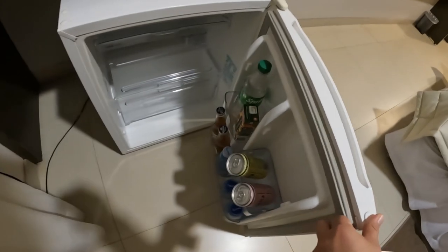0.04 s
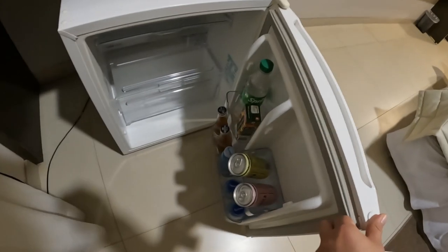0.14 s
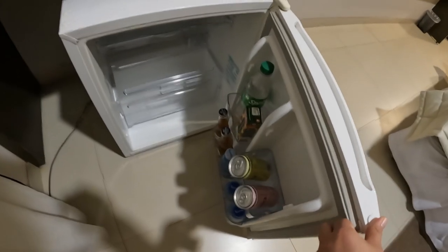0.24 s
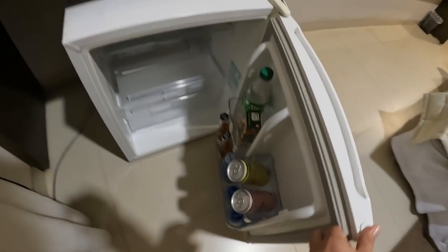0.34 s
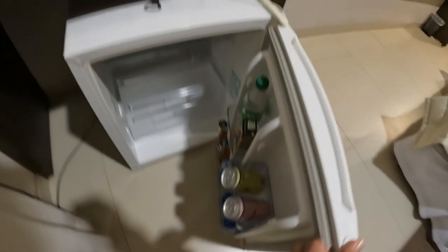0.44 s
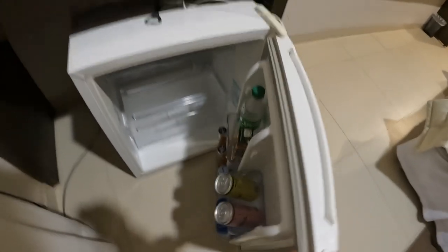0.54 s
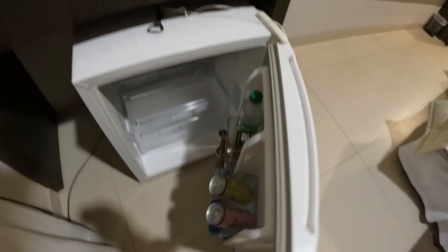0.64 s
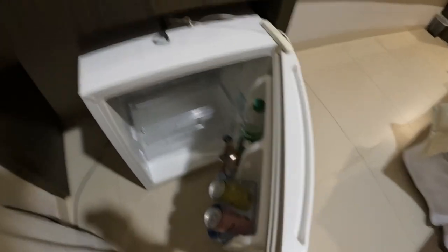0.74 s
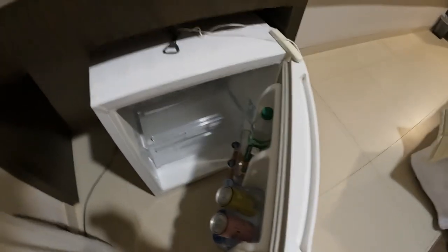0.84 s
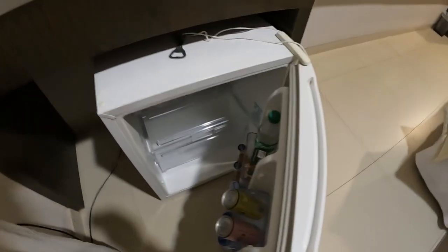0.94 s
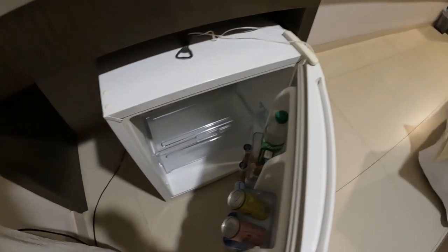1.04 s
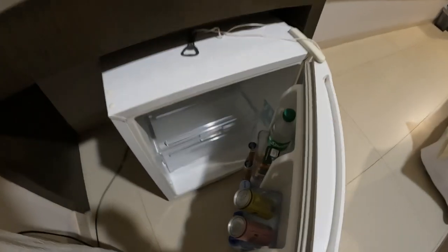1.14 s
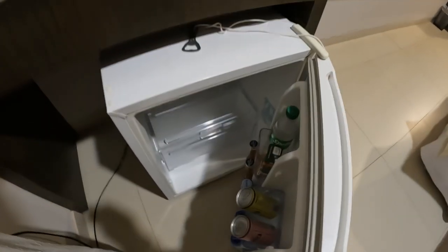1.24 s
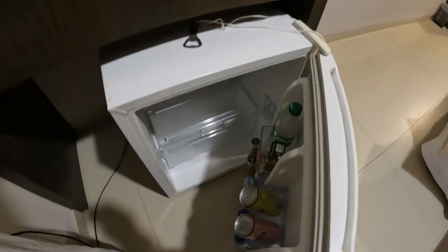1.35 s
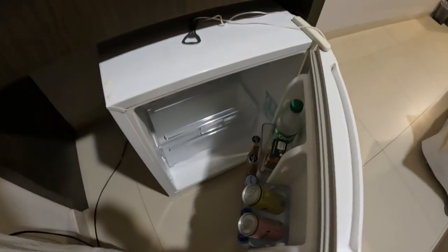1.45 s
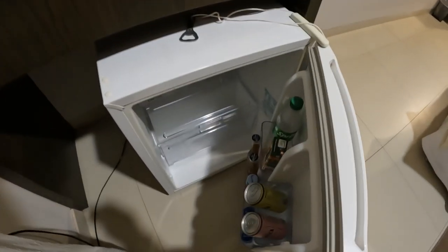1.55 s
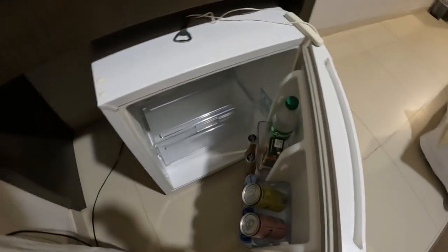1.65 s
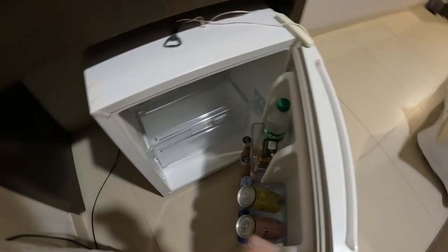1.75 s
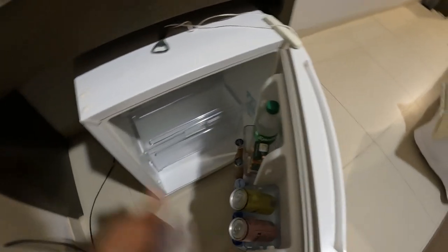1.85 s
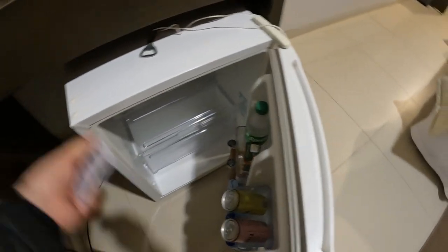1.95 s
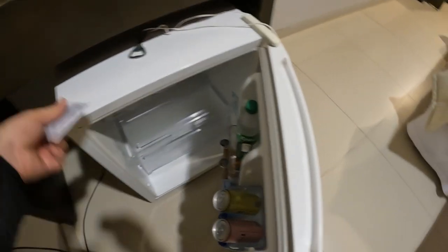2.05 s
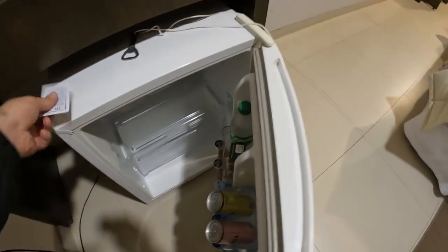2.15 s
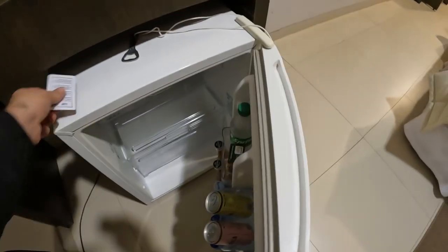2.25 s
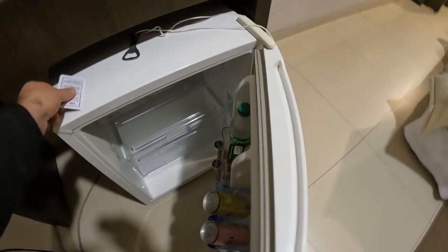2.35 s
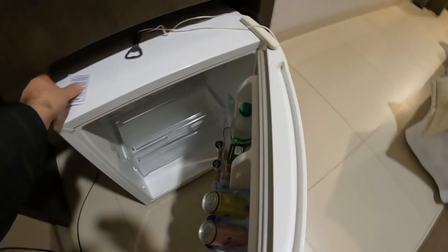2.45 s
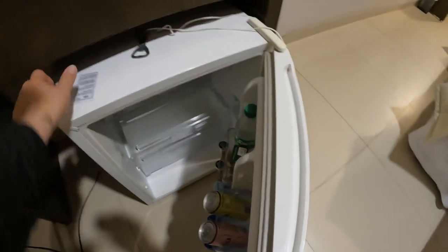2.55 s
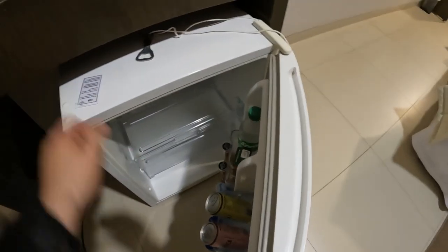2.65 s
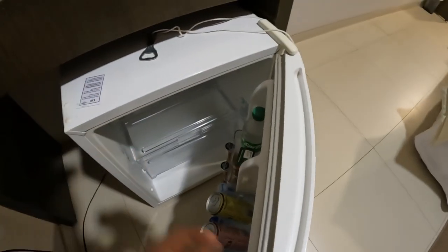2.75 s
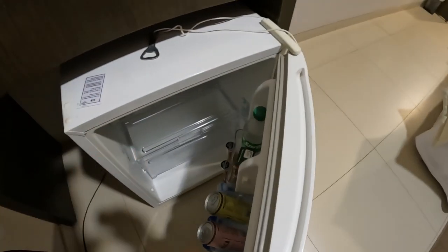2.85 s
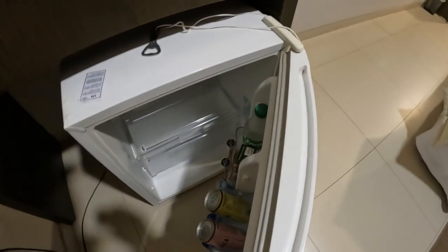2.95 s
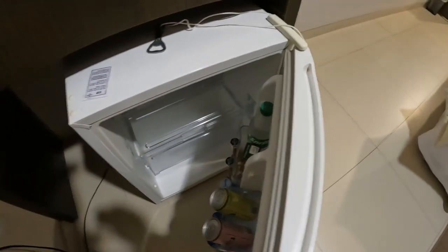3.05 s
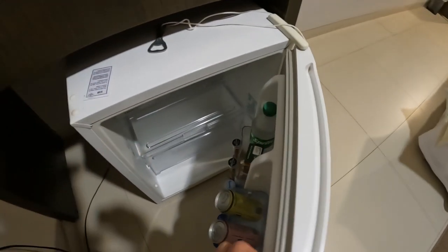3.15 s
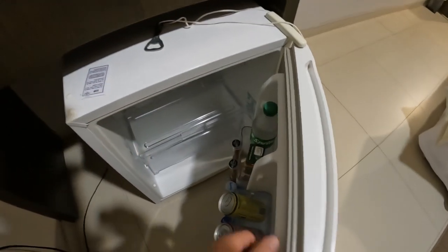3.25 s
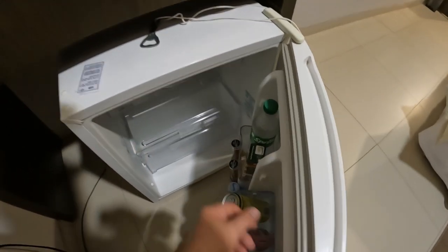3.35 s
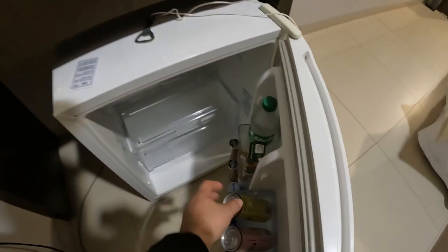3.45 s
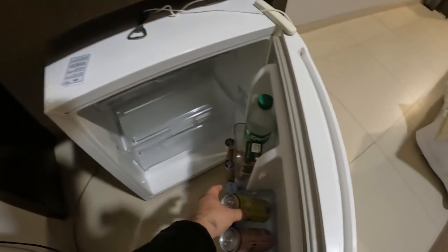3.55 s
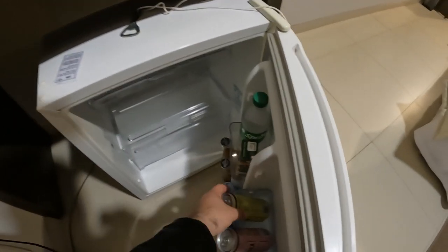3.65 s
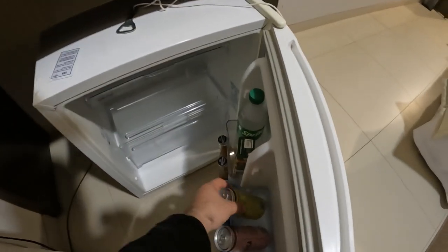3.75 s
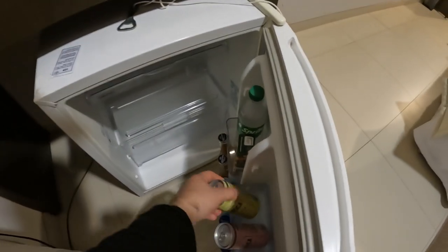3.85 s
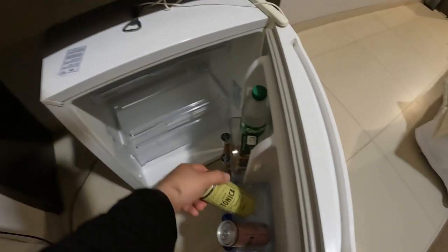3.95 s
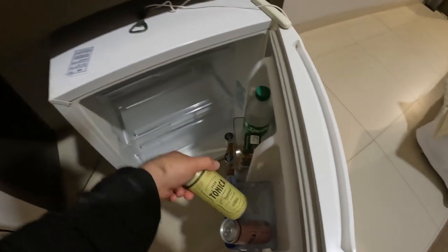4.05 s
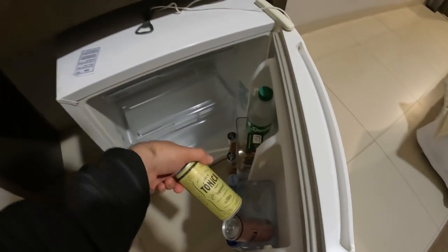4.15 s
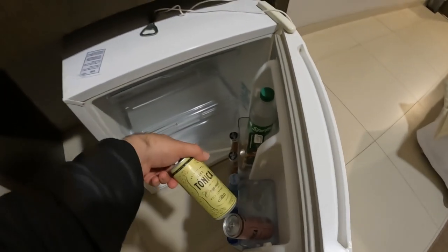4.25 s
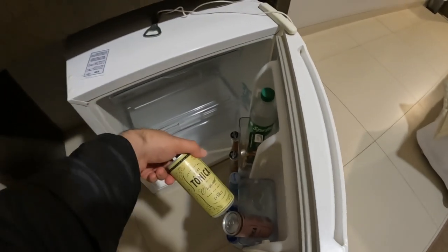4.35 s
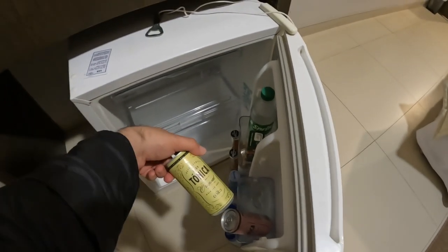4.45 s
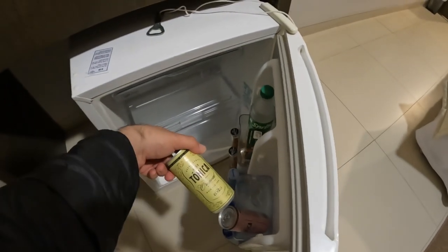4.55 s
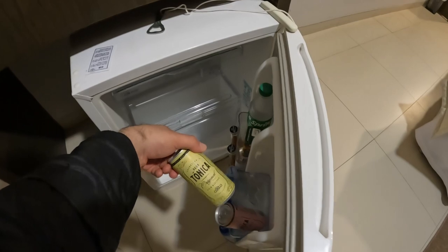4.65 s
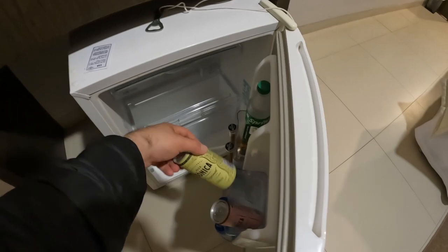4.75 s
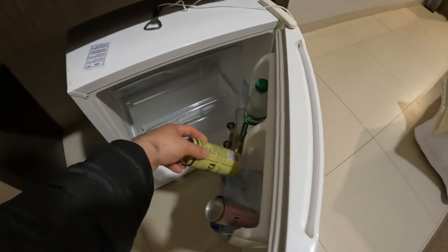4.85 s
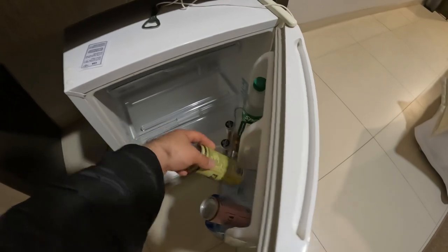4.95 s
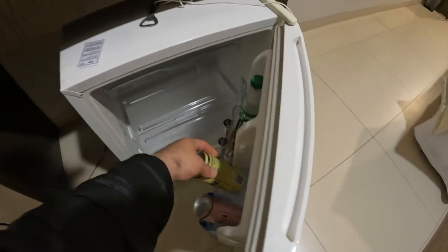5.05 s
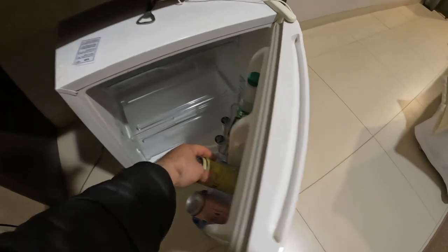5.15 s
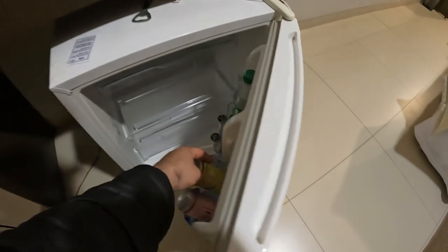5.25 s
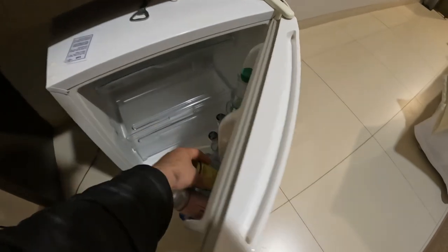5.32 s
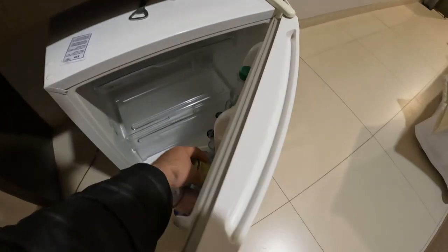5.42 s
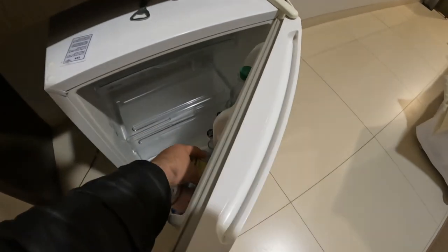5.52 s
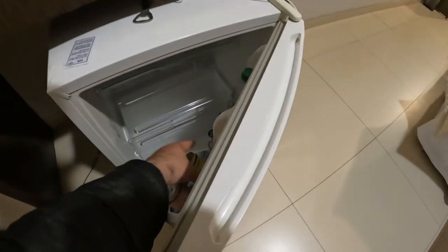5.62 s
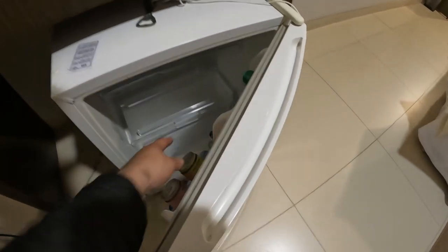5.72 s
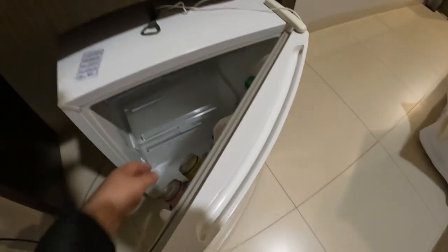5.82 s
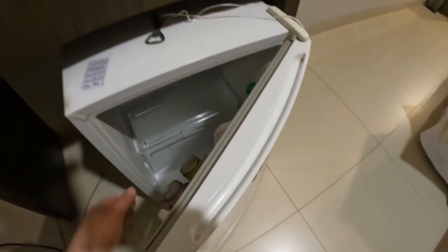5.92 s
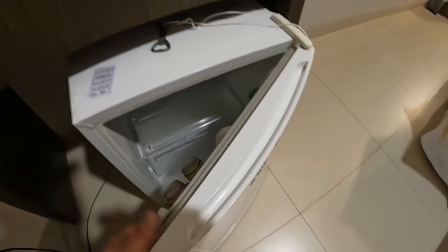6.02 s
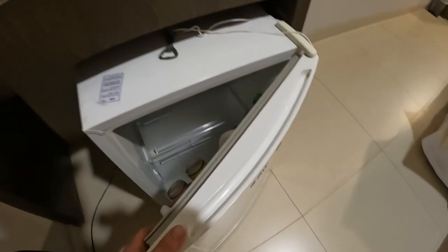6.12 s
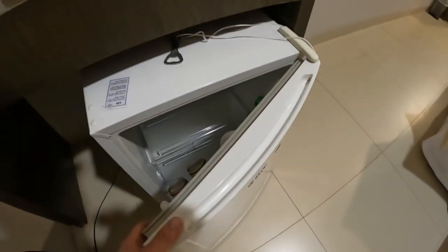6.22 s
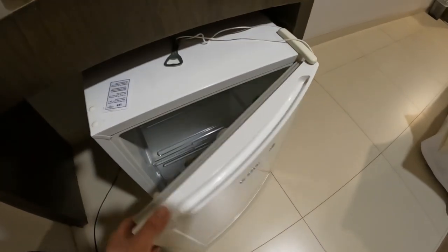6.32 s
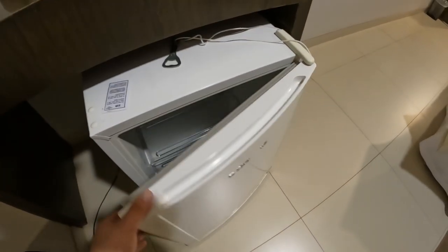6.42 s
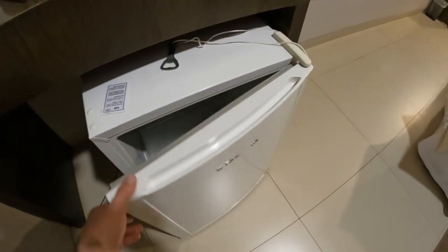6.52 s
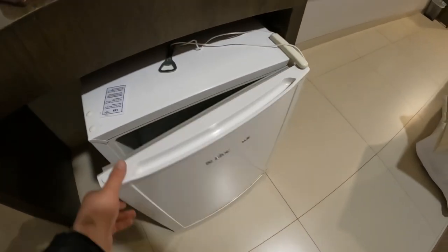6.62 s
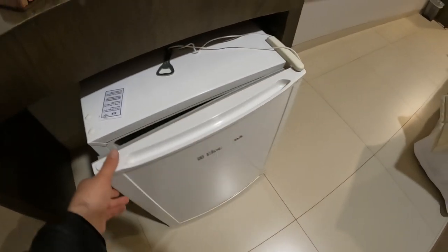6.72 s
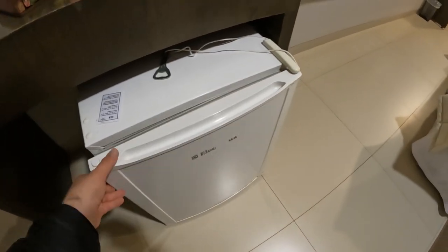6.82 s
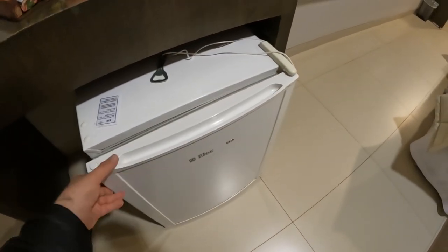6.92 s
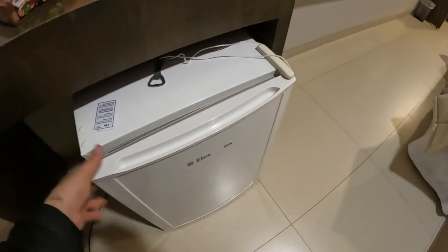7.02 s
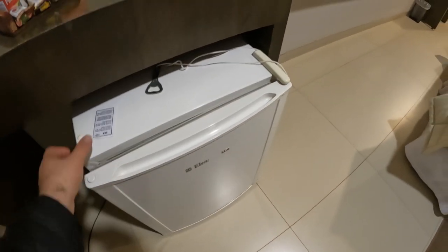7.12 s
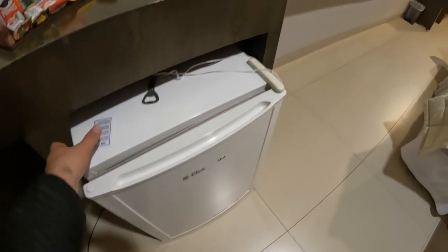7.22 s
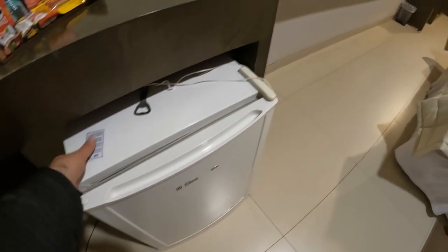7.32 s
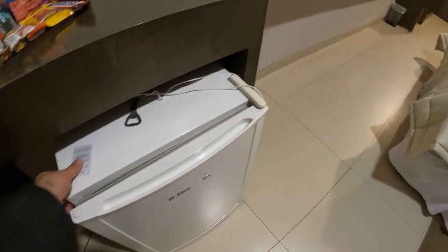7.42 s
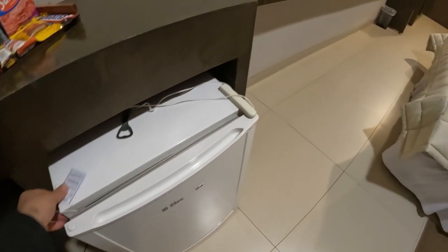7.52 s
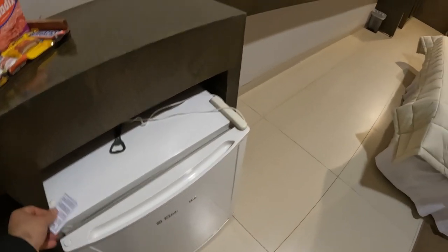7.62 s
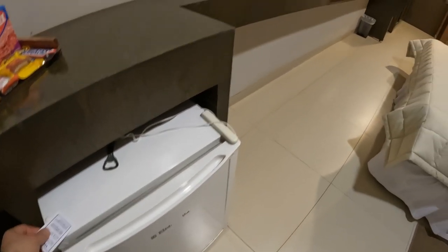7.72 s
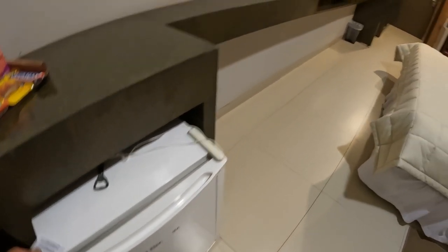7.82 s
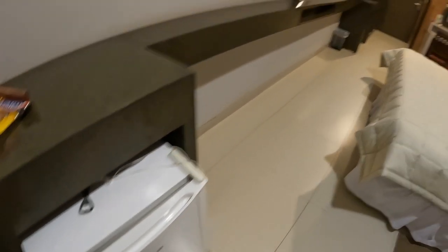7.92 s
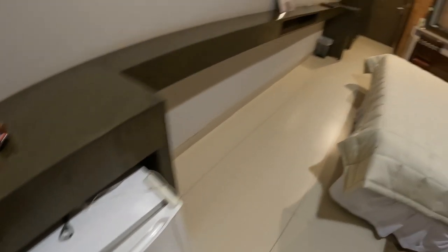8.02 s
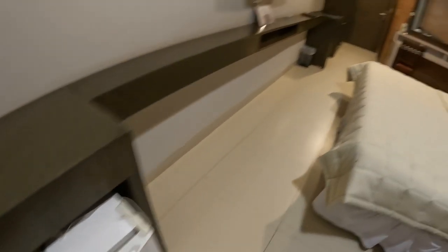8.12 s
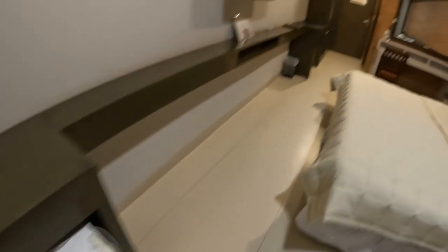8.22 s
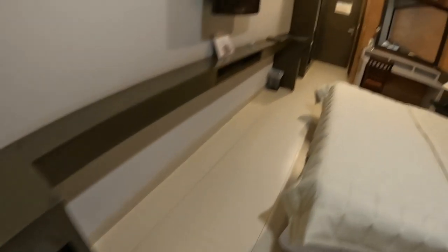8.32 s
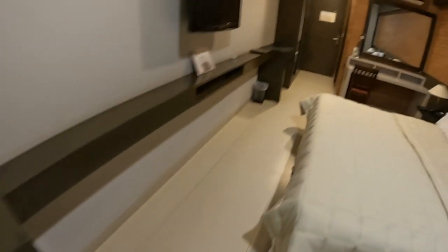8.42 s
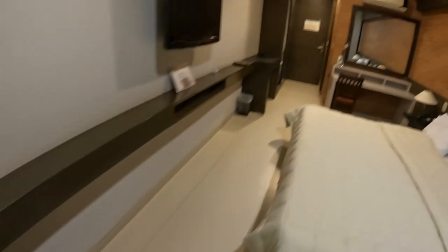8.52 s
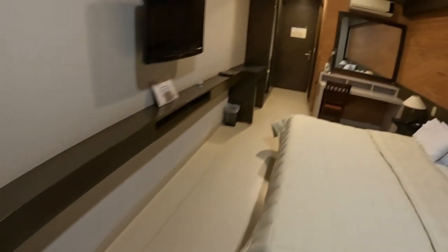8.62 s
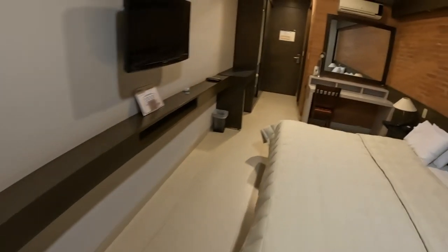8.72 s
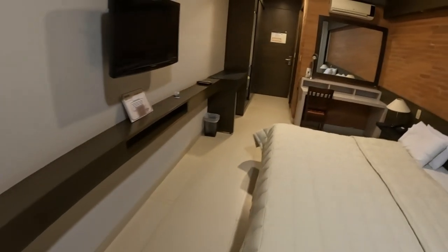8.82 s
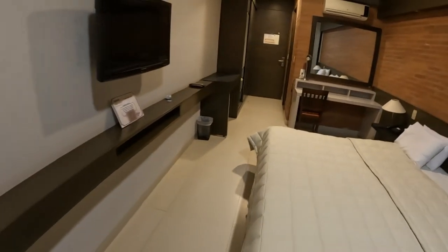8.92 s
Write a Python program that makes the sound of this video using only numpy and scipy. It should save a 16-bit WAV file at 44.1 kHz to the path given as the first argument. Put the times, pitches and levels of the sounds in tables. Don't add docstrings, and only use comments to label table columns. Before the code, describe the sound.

Close handling of a mini fridge: hollow plastic knocks, bright can clatter, a boomy door slam, then a squeaky plastic card drag.

```python
import sys
import numpy as np
from scipy import signal
from scipy.fft import rfft, irfft, next_fast_len
from scipy.io import wavfile
from scipy.ndimage import uniform_filter1d

SR = 44100
rng = np.random.default_rng(int(sys.argv[2]) if len(sys.argv) > 2 else 0)


def volts(x):
    e = np.asarray(x, float) / 20
    return 10 ** e


def pcm_store(signal):
    levels = np.round(np.clip(np.atleast_2d(signal), -1, 1) * 32767)
    wavfile.write(sys.argv[1], SR, levels.astype(np.int16).T)


N = 395577


def evened(x):
    return x / np.sqrt(np.mean(x ** 2) + 1e-20)


def peaked(x):
    return x / (abs(x).max() + 1e-20)


def read(points, hz):
    f, value = np.transpose(points)
    return np.interp(np.log(hz + 1), np.log(f + 1), value)


def curve(rows):
    rows = np.array(rows)
    return np.interp(np.arange(N) / SR, rows[:, 0], rows[:, 1])


def add(mix, start_s, sound):
    part = mix[..., round(start_s * SR):][..., :sound.shape[-1]]
    part += sound[..., :part.shape[-1]]


def band(x, lo_hz, hi_hz):
    sos = signal.butter(2, [lo_hz, min(hi_hz, 0.45 * SR)], "band", fs=SR, output="sos")
    return signal.sosfilt(sos, x)


def left_right(difference_db):
    return volts(np.array([[difference_db / 2], [-difference_db / 2]]))


def wander(count, size):
    return uniform_filter1d(rng.standard_normal(count), size=size)


def hiss(tone, same, side, patchy_db, flicker_db, size, tilt_db=np.zeros(N)):
    hop = size // 4
    frames, hz = 4 * N // size + 5, np.fft.rfftfreq(size, 1 / SR)
    a, b, c, d, patches = rng.standard_normal((frames, len(hz), 5)).T
    patches = uniform_filter1d(patches, size=6, axis=0)
    patches = evened(uniform_filter1d(patches, size=8, axis=1))
    flicker = evened(wander(frames, 3))
    frame_tilt = tilt_db[np.minimum(np.arange(frames) * hop, N - 1)]
    tilt = np.outer(np.log2((hz + 200) / 4000), frame_tilt)
    same = np.clip(read(same, hz), -1, 1)[:, None]
    left = a + 1j * b
    right = same * left + np.sqrt(1 - same ** 2) * (c + 1j * d)
    z = np.array([left, right])
    z *= volts(read(tone, hz)[:, None] + patchy_db * patches + flicker_db * flicker + tilt)
    z *= volts(np.multiply.outer([0.5, -0.5], read(side, hz)))[:, :, None]
    out = signal.istft(z, nperseg=size, noverlap=3 * hop)[1][:, :N]
    return out / np.sqrt(np.mean(out.mean(0) ** 2))


def ring(level_db, hz, t60_s, rise_s):
    t = np.arange(round(min(t60_s, 1.2) * SR)) / SR
    return volts(level_db - 60 * t / t60_s) * (1 - np.exp(-t / rise_s)) * np.sin(2 * np.pi * hz * t)


def knock(row, modes, rattle, linger, tone_hz, contact_s, treble_t60_s):
    start_s, body_db, shelf_db, tick_db = row
    t, noise = np.arange(SR // 3) / SR, rng.standard_normal((4, SR // 3))
    hz, db, t60 = np.transpose(2 * (list(modes) + [(tone_hz, 0, 0.08)]))[:, :, None]
    db = db + 4 * rng.standard_normal(hz.shape)
    hz = hz * (1 + 0.023 * rng.standard_normal(hz.shape))
    t60 = linger * np.minimum(t60, 0.32 * np.sqrt(500 / hz))
    tones = volts(db - 60 * t / t60) * np.sin(2 * np.pi * hz * t)
    blow = noise[0, :400] * np.exp(-t[:400] / 0.00045)
    is_low = hz[:, 0] < 800
    low = signal.oaconvolve(tones[is_low].sum(0), blow)[:len(t)]
    high = signal.oaconvolve(tones[~is_low].sum(0), blow)[:len(t)]
    loose = volts(1.7 * evened(uniform_filter1d(noise[0], size=150)))

    shelf_noise = band(noise[1] * volts(-60 * t / (0.34 * linger)), 154, 520)
    shelf = peaked(low) + rattle * peaked(shelf_noise)
    clatter = noise[2] * loose * (volts(-60 * t / 0.077) + 0.5 * volts(-60 * t / (0.24 * linger)))
    body = peaked(high) + rattle * peaked(band(band(clatter, 660, 1770), 690, 2670))
    crack = volts(-60 * t / 0.0027) + 0.83 * loose * volts(-60 * t / treble_t60_s)
    tick = band(band(noise[3] * crack, 1630, 5290), 1600, 16000)

    soft = 1 - np.exp(-t / contact_s)
    shelf *= 1 - np.exp(-t / 0.003)
    out = volts(shelf_db) * peaked(shelf) + volts(body_db) * peaked(body * soft)
    return start_s, out + volts(tick_db + 6.5) * peaked(tick * soft)


def struck(rows, modes, **feel):
    out = np.zeros(N)
    for row in rows:
        add(out, *knock(row, modes, **feel))
    return out


# start_s, body_db, shelf_db, tick_db
DOOR_BLOWS = [(0.314, -42, -44.5, -87), (0.347, -43, -38, -80), (0.798, -53, -35, -70),
              (0.827, -52, -37, -79), (0.8815, -33.5, -35, -55), (1.667, -34, -26.5, -44),
              (1.759, -37.5, -29.5, -58), (4.03, -57, -50.5, -58), (2.909, -45.5, -42.5, -52),
              (3.012, -68, -42.5, -81), (3.053, -55, -38.5, -74), (3.157, -51, -43.5, -56.5),
              (3.345, -50, -42, -71), (3.45, -28, -26.5, -46.5), (6.011, -48, -47.5, -53),
              (6.143, -47.5, -40, -54), (6.309, -53, -39.5, -76), (6.34, -38.5, -29.5, -62),
              (6.429, -55, -52, -80), (6.496, -51, -47, -85), (6.759, -53.5, -47.5, -69),
              (8.341, -52, -43, -64)]
# pitch_hz, level_db, t60_s
DOOR_MODES = [(182.7, 1.5, 1), (297.4, 1.5, 0.75), (360, 1, 0.14), (542, -15, 0.083), (645, -6.5, 0.41),
              (1025, -2, 0.56), (1122, 0, 0.16), (1450, 0, 0.45), (1780, -27.5, 0.21), (2020, -42.5, .12)]


def door():
    return struck(DOOR_BLOWS, DOOR_MODES, rattle=0.99, linger=0.64, tone_hz=1100,
                  contact_s=0.00056, treble_t60_s=0.07)


# start_s, body_db, shelf_db, tick_db
CAN_BLOWS = [(3.756, -35.5, -36, -58), (3.784, -24.5, -22.5, -41), (3.806, -21.5, -21.5, -35),
             (3.828, -36, -37, -45), (5.376, -40, -48, -58), (5.387, -13, -23.5, -22.5),
             (5.403, -16, -18, -31), (5.45, -20, -16, -45), (5.474, -15, -18.5, -28.5),
             (5.499, -22.5, -17.5, -53), (5.638, -31, -25, -44), (5.666, -25.5, -24, -53),
             (5.699, -23, -22, -45.5), (5.733, -35, -30, -62), (5.916, -44, -53, -69.5)]
# pitch_hz, level_db, t60_s
CAN_MODES = [(162.7, -9, 0.5), (250, -14, 0.68), (353.8, -4, 0.83), (773, -3.5, 0.14), (965, -13.5, 0.083),
             (1060, -19, 0.37), (1417, -22, 0.15), (1740, -20.5, 0.27), (2500, -29.5, 0.21),
             (2880, -20, 0.073)]


def cans():
    return struck(CAN_BLOWS, CAN_MODES, rattle=1.2, linger=0.55, tone_hz=1049,
                  contact_s=0.00036, treble_t60_s=0.068)


# start_s, body_db, shelf_db, tick_db
CARD_BLOWS = [(1.0095, -31, -42, -37.5), (2.408, -32, -39, -34.5), (2.428, -33.5, -44, -34),
              (2.446, -28.5, -31.5, -32), (2.568, -44, -35, -60), (7.68, -50, -45, -45)]
# pitch_hz, level_db, t60_s
CARD_MODES = [(247.5, -2, 0.25), (475.5, -9, 0.24), (685, -33, 0.12), (894, -32, 0.059), (1060, -3, 0.26),
              (1210, -32, 0.066), (2390, 6.5, 0.044), (2900, -31, .04)]


def card_slaps():
    return struck(CARD_BLOWS, CARD_MODES, rattle=1.05, linger=0.89, tone_hz=1258,
                  contact_s=0.00024, treble_t60_s=0.057)


# start_s, body_db, shelf_db, tick_db
SLAM_BLOWS = [(6.895, -16, -13.5, -26.5), (6.936, -20, -22, -47), (6.952, -24.5, -21.5, -45),
              (7.031, -31.5, -21, -55), (7.129, -55, -42, -64.5), (7.302, -36.5, -34.5, -60),
              (7.39, -45, -35.5, -58), (7.556, -47, -41.5, -63), (6.877, -43, -32.5, -59)]
# pitch_hz, level_db, t60_s
CABINET_MODES = [(184.6, -3.5, 0.53), (391.5, -3, 0.48), (497, -13, 0.15), (540, -30, 0.31),
                 (715, -12, 0.43), (920, -16, 0.57), (986, -4, 0.54), (1155, -10, 1), (1430, 3, 0.31),
                 (1600, -11, 0.26), (2100, -3, 0.21), (2340, -14, 0.23)]


def slam():
    return struck(SLAM_BLOWS, CABINET_MODES, rattle=1.55, linger=0.85, tone_hz=1400,
                  contact_s=0.0027, treble_t60_s=0.065)


def boom(level_db, hz, t60_s):
    spread = 1 + np.array([0, -0.099, 0.3, 1.2]) * rng.uniform(0.8, 1.2, 4)
    weights = [0.86, 0.3, 0.38, 0.21]
    return volts(level_db) * peaked(sum(w * ring(0, hz * k, t60_s, 0.0071) for k, w in zip(spread, weights)))


# start_s, level_db, t60_s
SIDE_PANEL = [(1.763, -29, 0.43), (1.85, -35.5, 0.26), (3.452, -28, 0.68), (5.471, -13.5, 0.58),
              (5.644, -23.5, 0.83), (5.697, -17.5, 0.54), (6.011, -39, 0.19), (6.399, -29.5, 0.37),
              (6.777, -35, 1)]
# start_s, level_db, t60_s
TOP_PANEL = [(1.669, -30.5, 0.73), (5.386, -26, 1), (6.319, -29.5, 0.78)]
# start_s, level_db, t60_s
BACK_PANEL = [(0.349, -35.5, 0.86), (0.901, -31.5, 0.089), (2.918, -33.5, 0.66), (6.15, -31.5, 0.66),
              (6.88, -20, 1), (6.896, -11, 0.29), (6.96, -11, 0.48), (7.089, -22.5, 0.1),
              (7.187, -23.5, 0.52), (7.309, -50, 0.86), (8.341, -50.5, 0.18)]
# start_s, level_db, pitch_hz, t60_s
FLOOR = [
    (1.68, -37.5, 43, 1.1),
    (2.92, -33, 33, 0.6),
    (6.892, -17, 32.1, 1.7),
]


def cabinet():
    out = np.zeros(N)
    for hz, rows in ((82.1, SIDE_PANEL), (108.9, TOP_PANEL), (64.17, BACK_PANEL)):
        for start_s, level_db, t60_s in rows:
            add(out, start_s, boom(level_db, hz, t60_s))
    for start_s, level_db, hz, t60_s in FLOOR:
        add(out, start_s, boom(level_db, hz, t60_s))
    return out


# start_s, level_db, pitch_hz, t60_s
BOTTLE_TONES = [(5.779, -50, 538, 1.8), (.316, -47.5, 545, 0.41), (.883, -38, 545, 0.21),
                (1.02, -44, 1085, 0.12), (1.762, -31, 675, 0.032), (3.758, -36, 306, 0.07),
                (3.811, -20.5, 364.6, 0.34), (5.39, -26, 366.7, 0.53), (5.477, -19.5, 374.7, 0.5),
                (5.678, -29, 301, 0.26), (6.95, -15, 243.5, 0.073), (7.305, -48, 1070, 0.38),
                (3.83, -60, 3800, 0.23), (3.86, -55, 3810, 0.07), (5.52, -51, 3860, .3),
                (6.42, -60, 1830, 0.042)]


def bottles():
    out = np.zeros(N)
    for start_s, level_db, hz, t60_s in BOTTLE_TONES:
        add(out, start_s, ring(level_db, hz, t60_s, 0.004) + 0.3 * ring(level_db, 1.03 * hz, t60_s, 0.004))
        add(out, start_s, ring(level_db + 3, hz, 0.08, 0.004))
    return out


# start_s, level_db, pitch_hz, t60_s
PINGS = [(.827, -40.5, 1035, .04), (0.847, -46, 950, .05), (0.315, -45, 1430, .06),
         (0.8813, -37, 1857, 0.053), (6.498, -51, 1820, 0.08), (1.011, -35, 2390, 0.041),
         (1.014, -34.5, 1222, 0.051), (2.408, -39, 1196, 0.071), (2.412, -38, 2690, 0.089),
         (2.426, -36, 4600, .05), (2.447, -30.5, 2474, 0.08), (2.446, -35.5, 1203, 0.17),
         (3.756, -35.5, 1040, .04), (3.7835, -14.5, 1065, 0.026), (3.7834, -26, 1600, 0.034),
         (3.7837, -31, 2840, 0.046), (3.7835, -32, 3330, 0.027), (3.7835, -43, 7100, 0.024),
         (3.806, -27.5, 3740, 0.028), (3.807, -38, 2400, 0.046), (3.811, -39, 3030, 0.044),
         (3.828, -36.5, 1490, 0.065), (3.846, -45, 1600, 0.05), (5.3873, -20, 1130, 0.058),
         (5.3875, -19, 1745, .08), (5.388, -21.5, 2358, 0.075), (5.388, -25, 2750, 0.066),
         (5.389, -34, 4237, .07), (5.388, -35, 5540, .05), (5.404, -20, 1984, 0.055),
         (5.404, -26, 1090, 0.045), (5.474, -17, 1422, 0.074), (5.475, -21.5, 916, 0.12),
         (5.471, -23.5, 2745, 0.045), (5.472, -24, 3890, 0.049), (5.472, -30.5, 5990, 0.032),
         (5.699, -29.5, 1755, 0.036), (5.7, -36.5, 4130, 0.029), (6.311, -43.5, 1820, 0.059),
         (6.31, -43, 1365, 0.064), (6.34, -28, 1090, 0.033), (6.342, -37, 1795, 0.05),
         (6.936, -23, 2000, .05), (6.935, -24, 970, 0.055), (7.031, -22, 984, 0.074),
         (7.03, -28, 1450, 0.047), (7.033, -37.5, 3430, 0.041),
         (.348, -45.5, 560, .2), (.815, -38, 350, 0.12), (.727, -46, 400, 0.11), (1.684, -41, 1450, .07),
         (1.759, -32.5, 1124, 0.056), (3.012, -40.5, 331, 0.15), (3.055, -49, 960, 0.078),
         (3.158, -42, 319, 0.34), (3.45, -29, 1155, 0.045), (3.452, -33, 648, 0.2),
         (6.011, -47.5, 1130, 0.041), (6.925, -23.5, 706, .1), (6.93, -17, 369.5, 0.22),
         (6.96, -28.5, 1090, 0.27), (7.305, -33.5, 192.5, 0.47), (8.338, -39, 225, 0.13),
         (8.338, -44.5, 414, 0.085), (8.465, -46.5, 303, 0.13)]


def clinks():
    out = np.zeros(N)
    for start_s, level_db, hz, t60_s in PINGS:
        add(out, start_s, 0.85 * ring(level_db, hz, t60_s, 0.00037))
        add(out, start_s, 0.48 * ring(level_db, 1.06 * hz, 0.7 * t60_s, 0.00034))
    return out


def chatter(x):
    return x * volts(2.5 * evened(wander(N, 220)))


# start_s, level_db, top_hz
CONTACTS = [(.8, -52, 1500), (2.428, -44, 2500), (2.608, -53, 6200), (3.796, -34, 4500), (3.812, -29, 4500),
            (3.817, -41, 5200), (3.831, -42, 2800), (3.851, -42, 1820), (3.863, -44, 6500),
            (5.366, -49, 1580), (5.392, -25, 2400), (5.412, -31, 3000), (5.487, -25, 3500),
            (5.645, -40, 5500), (5.643, -32, 1400), (6.894, -29, 3500), (6.903, -21, 1790),
            (6.907, -25, 2500), (6.916, -21.5, 2170), (6.932, -36, 3800), (6.967, -27, 1800),
            (7.045, -37, 2500), (.148, -61, 5500), (4.37, -58, 2720), (.055, -57, 4000), (0.653, -49, 900),
            (.545, -48, 2330), (.62, -46, 2100), (.67, -41, 2000), (6.165, -45, 2900), (8.466, -46, 1200),
            (8.49, -51, 8000), (3.838, -37.5, 5510), (5.667, -35.5, 4000), (6.945, -33, 3600),
            (6.958, -40, 4500), (6.978, -34.5, 3200), (6.99, -36, 2000), (7.035, -48, 4170),
            (5.51, -28.5, 3000), (5.53, -41, 4000), (1.015, -41, 5460), (7.31, -48, 3500),
            (5.13, -53.5, 1507), (3.98, -51, 900), (4.089, -50.5, 1350)]
# start_s, level_db, top_hz
EDGE_CRACKS = [(1.009, -34, 8950), (1.6645, -37, 7000), (2.408, -27, 9000), (2.4275, -43, 8000),
               (2.4462, -18, 9600), (3.7838, -37, 6000), (3.8062, -30, 9000), (5.3883, -17, 8000),
               (5.4724, -21, 7000), (5.636, -44, 8000), (5.6997, -26, 6000), (7.031, -44, 5000),
               (7.303, -50, 4990), (8.663, -34.5, 6000), (6.34, -44, 5500), (7.56, -39, 6020),
               (7.591, -42, 6000), (7.601, -31.5, 9000), (7.6128, -36, 9000), (7.6805, -29.5, 9030)]


def ticks():
    out, t = np.zeros(N), np.arange(2000) / SR
    tick_t60_s, crack_t60_s = 0.047, 0.006
    for start_s, level_db, hz in CONTACTS:
        puff = rng.standard_normal(len(t)) * volts(-60 * t / tick_t60_s)
        add(out, start_s, volts(level_db) * peaked(band(puff, 0.55 * hz, 1.07 * hz)))
    for start_s, level_db, top_hz in EDGE_CRACKS:
        burst = rng.standard_normal(len(t)) - 6 * (t == 0)
        crack = band(burst * volts(-60 * t / crack_t60_s), 2000, top_hz)
        add(out, start_s, volts(level_db) * peaked(band(crack, 300, 1.2 * top_hz)))
    return out


# freq_hz, left_minus_right_db
PORT_SIDE = [(120, 0), (240, 0.5), (480, -.5), (950, -.5), (3770, 1.5), (7520, 4.5),
                            (15000, 9.5)]
# freq_hz, left_lead_rad
PORT_LEAD = [(250, 0), (550, .5), (1000, .3), (2000, -.55), (4000, -.55), (8400, -.4), (12000, .3)]


def ports(x):
    size = next_fast_len(N)
    hz = np.fft.rfftfreq(size, 1 / SR)
    half = volts(0.5 * read(PORT_SIDE, hz)) * np.exp(0.5j * read(PORT_LEAD, hz))
    return irfft(rfft(x, size) * np.array([half, 1 / half]), size)[:, :N]


# freq_hz, t60_s
ROOM_DECAY = [(100, 0.74), (500, 0.38), (2000, 0.34), (8000, 0.22)]


def room(x, wide):
    taps = np.zeros((2, SR))
    at = np.arange(300, SR - 20, 20) + rng.integers(0, 20, (2, (SR - 301) // 20))
    np.put_along_axis(taps, at, rng.choice([-1.0, 1.0], at.shape), 1)
    hz, t, z = signal.stft(taps, SR, nperseg=256)
    mid, side = signal.istft(z * volts(-60 * t / read(ROOM_DECAY, hz)[:, None]), SR, nperseg=256)[1]
    side = wide * band(side, 400, 15000)
    echo = np.array([mid + side, mid - side]) / np.linalg.norm(mid)
    return signal.fftconvolve(x[None], echo, axes=1)[:, :N]


# time_s, slips_per_s
SLIPS = [(7.638, 816), (7.653, 1122), (7.668, 1060)]
SLIP_HARMONICS_DB = [-46.5, -45.5, -51, -47, -52]


def judder():
    start_s, end_s = SLIPS[0][0], SLIPS[-1][0]
    hz = curve(SLIPS)[round(start_s * SR):round(end_s * SR)]
    turns = np.cumsum(hz + 120 * wander(len(hz), 60)) / SR
    buzz = sum(volts(db) * np.sin(2 * np.pi * (k + 1) * turns) for k, db in enumerate(SLIP_HARMONICS_DB))
    return start_s, np.sqrt(np.hanning(len(hz))) * buzz


# time_s, level_db
DRAG_LEVEL = [(7.44, -76), (7.49, -57), (7.52, -46.5), (7.585, -50), (7.65, -40.5), (7.69, -46),
              (7.705, -50), (7.8, -64)]
# freq_hz, level_db_per_hz
SCRAPE_TONE = [(290, -32), (500, -9), (760, -30), (891, -3), (1940, -8), (2210, -5), (7560, -6),
               (12000, -10.5), (15800, -28)]
# start_s, end_s, start_hz, end_hz, level_db
EDGE_SQUEAKS = [(7.507, 7.54, 1250, 2300, -44), (7.512, 7.545, 1150, 1750, -48),
                (7.601, 7.618, 4950, 6600, -44), (7.607, 7.637, 6500, 5100, -42),
                (7.66, 7.675, 6000, 5000, -48), (7.738, 7.76, 4200, 4100, -49),
                (7.742, 7.76, 6250, 6150, -57), (7.678, 7.692, 1050, 1050, -47),
                (7.595, 7.64, 7300, 7900, -53), (3.218, 3.258, 7500, 8000, -62),
                (3.245, 3.288, 8800, 11200, -63)]


def card_drag():
    scrape = hiss(SCRAPE_TONE, [(500, 0.85), (9000, 0.87)], [(500, 2.0), (9000, 4.9)], 3.0, 2.7, size=256)
    out = volts(curve(DRAG_LEVEL) - 7.5) * scrape
    sample = np.arange(N)
    out *= (sample > DRAG_LEVEL[0][0] * SR) & (sample < DRAG_LEVEL[-1][0] * SR)
    for start_s, end_s, start_hz, end_hz, level_db in EDGE_SQUEAKS:
        hz = np.linspace(start_hz, end_hz, round((end_s - start_s) * SR))
        hz += 450 * wander(len(hz), 60)
        swell = np.sqrt(np.hanning(len(hz))) * (0.76 + 3 * wander(len(hz), 50))
        squeak = swell * np.sin(2 * np.pi * np.cumsum(hz) / SR)
        add(out, start_s, volts(level_db) * left_right(3) * squeak)
    add(out, *judder())
    return out


SLEEVE_REST_DB = -93.5
# fastest_s, level_db, swell_db_per_s, fade_db_per_s
ARM_STROKES = [(0.01, -67.5, 50, 108), (.65, -52, 82, 56), (1.3, -69.5, 9, 72), (2.02, -55.5, 32, 20.5),
               (2.75, -53, 21, 41), (3.6, -51, 31, 26), (5.3, -66, 21, 11.5), (5.92, -58, 20, 23.5),
               (6.97, -60.5, 26.5, 59.5), (7.65, -58.5, 33, 1.5), (8.25, -60.5, 13, 11.5)]


def arm_db():
    t = np.arange(N) / SR
    power = volts(SLEEVE_REST_DB) ** 2
    for fastest_s, level_db, swell, fade in ARM_STROKES:
        power = power + volts(level_db - np.maximum(swell * (fastest_s - t), fade * (t - fastest_s))) ** 2
    return 10 * np.log10(power)


# freq_hz, level_db_per_hz
CLOTH_TONE = [(290, -13), (500, -0.5), (561, -11.5), (760, -15), (1090, 2), (2090, 0), (2600, -2),
              (5500, -4), (7560, -8.5), (9120, -17), (12000, -17), (13700, -28.5), (15800, -23.5)]
# freq_hz, likeness_0_to_1
CLOTH_SAME = [(60, 0.75), (950, 0.31), (3770, 0.49), (15000, 0.65)]
# freq_hz, left_minus_right_db
CLOTH_SIDE = [(60, 2), (150, 9), (950, 5), (2380, 6), (5980, 1.5), (15000, 12)]
# start_s, level_db, centre_hz
CLOTH_SNAPS = [(0.648, -39, 2330), (1.42, -58, 2000), (3.22, -58, 12000), (3.6994, -66, 3140),
               (4.992, -55.5, 10200), (5.8563, -47.5, 5855), (5.886, -49, 3317), (7.5704, -46.5, 2020),
               (8.757, -60, 10000), (8.6635, -52, 4600), (8.8634, -48, 1400)]


def sleeve():
    rub_db = arm_db()
    tilt_db = 0.94 + 0.0178 * (rub_db - SLEEVE_REST_DB)
    tilt_db += -1.6 * (np.arange(N) > 7.8 * SR)
    out = volts(rub_db) * hiss(CLOTH_TONE, CLOTH_SAME, CLOTH_SIDE, 1.0, 0.67, size=256, tilt_db=tilt_db)
    t = np.arange(800) / SR
    for start_s, level_db, hz in CLOTH_SNAPS:
        snap = band(rng.standard_normal(len(t)) * volts(-60 * t / 0.057), 0.66 * hz, 1.25 * hz)
        add(out, start_s, volts(level_db) * left_right(10) * peaked(snap))
    return out


# time_s, effort_db
BODY_EFFORT = [(0.0, -35), (0.35, -27.5), (0.95, -8.5), (1.4, -24), (1.85, -27.5), (3.4, -16), (3.75, -17),
               (4.47, -36.5), (5.4, -32), (5.59, -12), (5.95, -23), (6.22, -11.5), (6.77, -23.5),
               (7.07, 2.5), (7.29, -11.5), (7.5, -7), (7.9, -24.5), (8.97, -25)]
# freq_hz, level_db_per_hz
SHAKE_TONE = [(5.9, -32), (10, -7.5), (27, -2.5), (38, -30), (59, -13.5), (76, -48), (130, -64.5),
              (220, -120)]
# freq_hz, level_db_per_hz
SHUFFLING_TONE = [(60, -30.5), (120, 2.5), (220, 2), (400, -4), (650, -25.5), (1200, -17.5), (2500, -62)]
# freq_hz, level_db_per_hz
ROOM_HUM_TONE = [(41, -41), (70, -25), (113, -7), (151, 0.5), (227, -3), (263, -18.5), (619, -24),
                 (900, -30.5), (1170, -58), (1980, -120)]


def rumble():
    effort_db = curve(BODY_EFFORT)
    deep = hiss(SHAKE_TONE, [(20, 0.89), (90, 0.89)], [(20, -6.5), (90, 8.5)], 2.54, 3.1, size=4096)
    shake = volts(-43.5 + 0.18 * effort_db) * evened(band(deep, 4.6, 42))
    drone = evened(band(band(deep.mean(0), 42.4, 130), 49.6, 150))
    drone = volts(-49 + 0.51 * effort_db) * drone
    hum = hiss(ROOM_HUM_TONE, [(100, 0.31), (800, 0.21)], [(100, -6.0), (800, -10.0)], 3.4, 2.3, size=2048)
    shuffle = hiss(SHUFFLING_TONE, [(100, 0.99), (800, 0.92)], [(100, -0.2), (800, -0.6)], 2.5, 2, size=1024)
    return shake + drone + volts(-65.5) * hum + volts(-37.5 + 1.1 * effort_db) * shuffle


def mic_noise():
    lo_hz, hi_hz = 4830, 7850
    noise = band(rng.standard_normal((2, N)), lo_hz, hi_hz)
    return volts(-81.5) * evened(band(noise, lo_hz, hi_hz))


def scene():
    blows = door() + cans() + card_slaps() + slam()
    pings = clinks()
    front = ports(blows + bottles() + ticks() + chatter(pings))
    echo = volts(-9) * room(blows + 0.6 * pings, wide=0.34)
    return front + echo + cabinet() + card_drag() + sleeve() + rumble() + mic_noise()


def band_limit(x):
    return signal.sosfilt(signal.butter(12, 16480, fs=SR, output="sos"), x)


def record(dry):
    dull = signal.sosfilt(signal.butter(8, 14300, fs=SR, output="sos"), dry)
    return band_limit(dull)


dry = scene()
out = record(dry)
pcm_store(out)
```